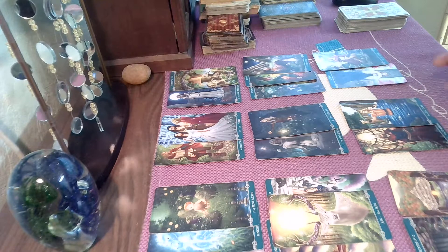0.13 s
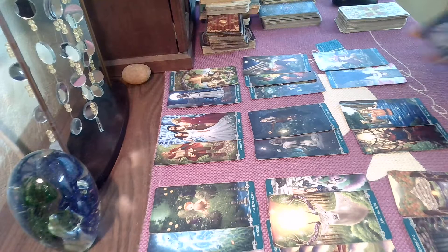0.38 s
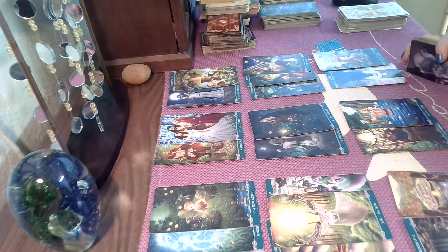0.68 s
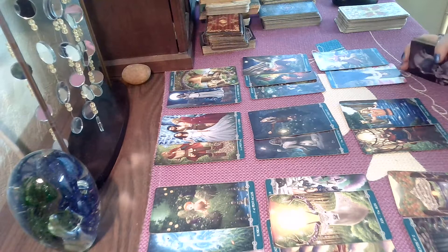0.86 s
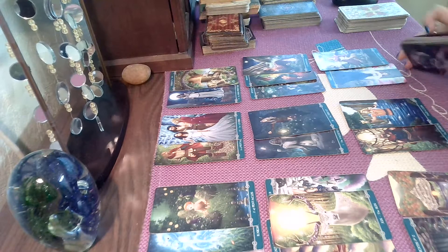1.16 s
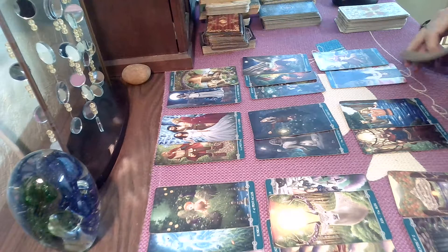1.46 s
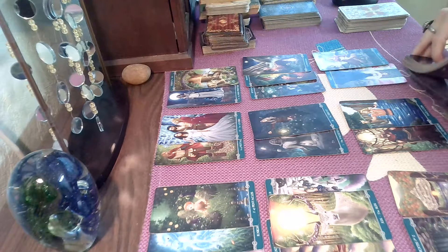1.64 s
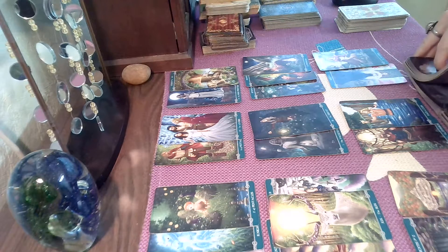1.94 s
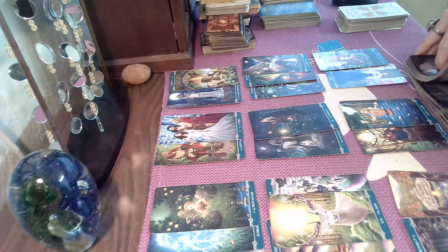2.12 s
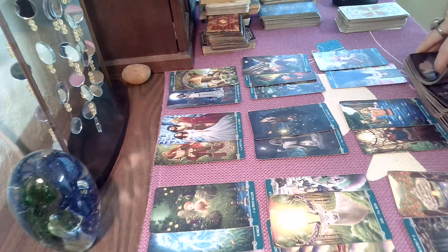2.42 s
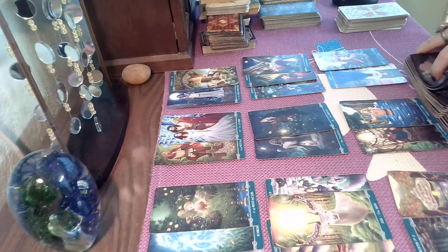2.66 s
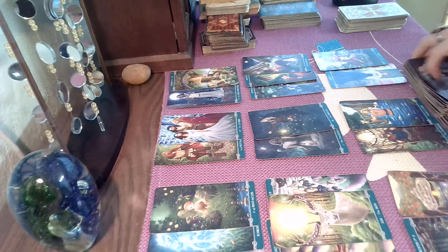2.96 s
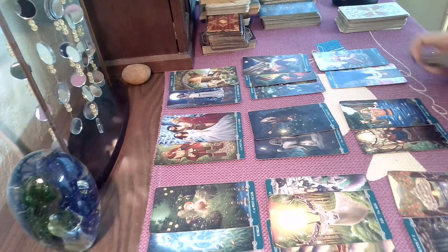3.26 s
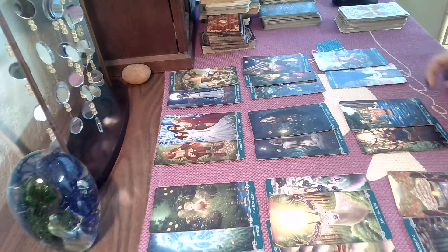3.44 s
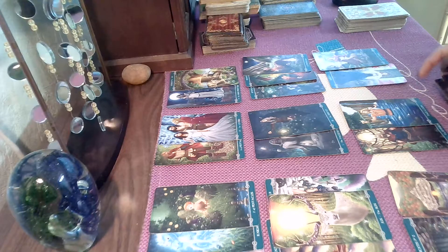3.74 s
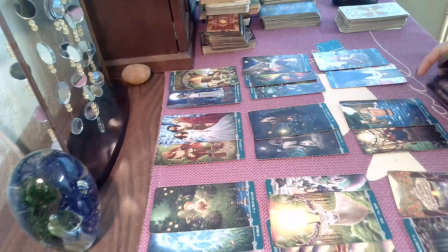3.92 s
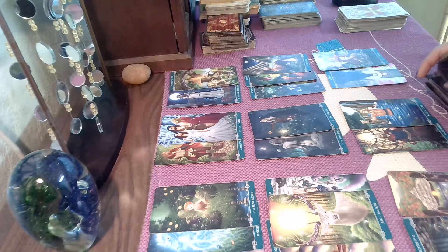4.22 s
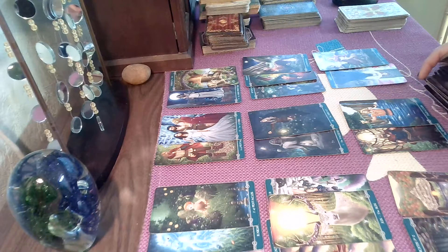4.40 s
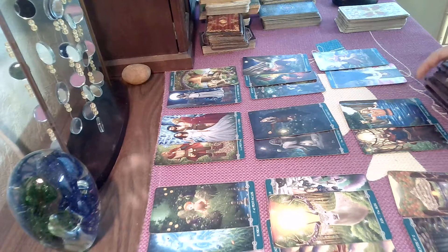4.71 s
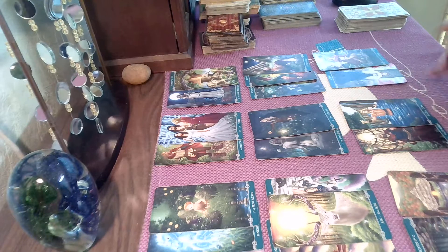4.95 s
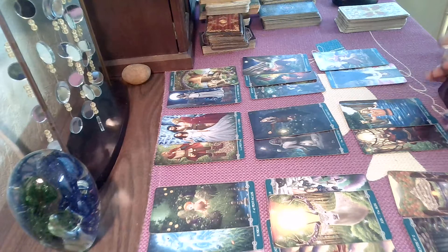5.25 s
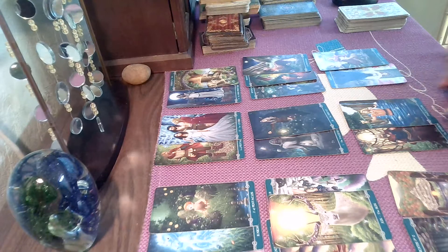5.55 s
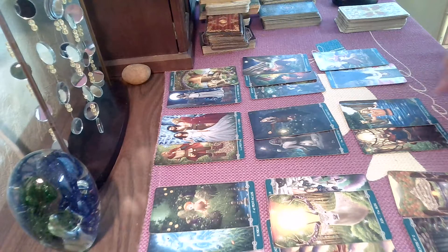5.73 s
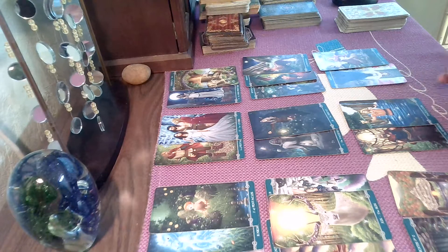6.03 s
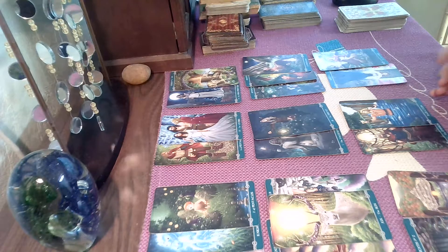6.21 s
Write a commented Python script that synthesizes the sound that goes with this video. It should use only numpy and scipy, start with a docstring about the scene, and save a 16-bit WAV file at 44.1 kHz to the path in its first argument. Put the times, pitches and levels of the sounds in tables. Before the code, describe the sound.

Close in a small room, a deck of large cards lands on a cloth-covered table with a quick soft triple thump. After a pause, an uneven snapping riffle swells and dies over a rubbing rustle. The halves are then slid together with scrapes and clicking edges, closing in a hollow tock, followed by soft double-edged knocks. Low rumble and faint hiss lie underneath.

```python
"""A small room with a cloth-covered table, beside which a deck of large cards is shuffled by hand.
The cards are riffled in uneven snapping packets (a push and a dying flutter through card bodies),
then slid together with a ticking rustle (random slips coloured by the card faces, edges catching).
Before and after, the deck is knocked square with soft thumps (thump, clack and air puff per landing).
Noise answers give the room; below lie its rumble and hiss and the dull flexing of the deck."""
import sys
import numpy as np
from scipy import signal
from scipy.fft import rfft, irfft, next_fast_len
from scipy.io import wavfile
from scipy.ndimage import map_coordinates

SR = 44100
rng = np.random.default_rng(int(sys.argv[2]) if len(sys.argv) > 2 else 0)


def int16_out(signal):
    """Quantize to a 16-bit WAV file."""
    q = np.round(np.clip(np.atleast_2d(signal).T, -1, 1) * 32767)
    wavfile.write(sys.argv[1], SR, q.astype(np.int16))


N = 280872  # samples


def amp(db):
    """Amplitude gain of a level in dB."""
    return 10 ** (np.asarray(db) / 20)


def unit(x):
    """x at rms 1."""
    return x / np.sqrt(np.mean(x ** 2) + 1e-20)


def along(points, hz):
    """(frequency [Hz], value) points interpolated on a log frequency axis."""
    point_hz, values = np.transpose(points)
    return np.interp(np.log(hz + 1), np.log(point_hz), values)


def wobble(knots_per_s):
    """A smooth random curve through normally distributed knots."""
    knots = rng.standard_normal(int(N * knots_per_s / SR) + 4)
    return map_coordinates(knots, [np.arange(N) * knots_per_s / SR])


def filtered(x, response):
    """x times a response of frequency, zero-padded against wrap-around."""
    size = next_fast_len(x.shape[-1] + 2048, True)
    size += size % 2
    spectrum = rfft(x, size) * response(np.fft.rfftfreq(size, 1 / SR))
    return irfft(spectrum, size)[..., :x.shape[-1]]


def coloured(x, spectrum, peaks=()):
    """x through a causal, minimum-phase body with this spectrum and these narrow resonances."""
    def response(hz):
        gain = amp(along(spectrum, hz))
        for centre_hz, width_hz, db in peaks:
            detune = 2 * (hz - centre_hz) / width_hz
            gain = gain * np.sqrt(1 + amp(db) ** 2 / (1 + detune ** 2))
        # folding the cepstrum onto positive time makes the phase minimal
        cepstrum = irfft(np.log(gain))
        cepstrum[..., 1:len(hz) - 1] *= 2
        cepstrum[..., len(hz):] = 0
        return np.exp(rfft(cepstrum))
    return filtered(x, response)


def contacts(t60_s, flutter_db, spectrum, peaks=(), size=3072):
    """One row of unit energy per contact: a sharp push plus a dying flutter of card edges."""
    t = np.arange(size) / SR
    decay = 1000. ** (-t / np.maximum(t60_s, .001)[:, None])
    force = rng.standard_normal((len(t60_s), size)) * decay
    force *= amp(np.reshape(flutter_db, (-1, 1))) / np.linalg.norm(force, axis=1, keepdims=True)
    force[:, 0] += 1  # the push
    sound = coloured(force, spectrum, peaks)
    return sound / np.linalg.norm(sound, axis=1, keepdims=True)


def placed(times_s, sounds):
    """Rows of sound summed at their times."""
    index = np.round(times_s * SR).astype(int)[:, None] + np.arange(sounds.shape[1])
    return np.bincount(index.ravel(), sounds.ravel(), N)[:N]


def swells(rows):
    """Sum of bell-shaped gains, one per (time of peak [s], level [dB], half length to 1/e [s]) row."""
    t = np.arange(N) / SR
    return sum(amp(db) * np.exp(-((t - s) / half_s) ** 2) for s, db, half_s in rows)


def slips(slips_per_s, spread_db, smooth):
    """Friction force of rms 1: tiny slips of uneven size on a smooth drag."""
    sizes = amp(spread_db * np.minimum(rng.exponential(size=N), 3)) * rng.choice([-1, 1], N)
    impulses = unit(sizes * (rng.random(N) < slips_per_s / SR))
    return unit(impulses + smooth * rng.standard_normal(N))


# background spectrum: (frequency [Hz], relative level [dB per Hz])
AIR_SPECTRUM = [(12, -33), (20, -7), (30, 1), (64, -13), (119, -10), (148, -20.5), (238, -23), (315, -25.5),
                (362, -24.5), (439, -28.5), (631, -28), (705, -28), (1820, -31), (3080, -30),
                (15500, -33.5)]
AIR_RMS_DB, AIR_TOP_HZ = -53, 15900


def air():
    """Steady room rumble and microphone hiss: stationary shaped noise."""
    noise = filtered(rng.standard_normal(N), lambda hz: amp(along(AIR_SPECTRUM, hz)) * (hz < AIR_TOP_HZ))
    return amp(AIR_RMS_DB) * unit(noise)


# reverberation time of the tail: (frequency [Hz], t60 [s])
ROOM_T60 = [(150, 0.52), (600, 0.29), (3000, 0.28), (14000, 0.12)]


def room(x, near_db=-11, tail_db=-8, count=48):
    """Near surfaces answer around 8 ms; a diffuse tail follows, both drawn afresh per equal stretch."""
    out = np.zeros(N + SR)
    hz, t, z = signal.stft(rng.standard_normal((count, SR // 2)), SR, nperseg=256)
    decay = 1000. ** (-t / along(ROOM_T60, hz)[:, None])
    tails = signal.istft(z * decay, SR, nperseg=256)[1]
    t = np.arange(tails.shape[1]) / SR
    tails *= 1 - np.exp(-(t / 0.0045) ** 2)  # gradual onset
    tails /= np.linalg.norm(tails, axis=1, keepdims=True)
    near = rng.standard_normal(tails.shape) * np.exp(-((t - .008) / 0.0023) ** 2)
    near /= np.linalg.norm(near, axis=1, keepdims=True)
    answers = amp(near_db) * near + amp(tail_db) * tails
    for part, answer in zip(np.array_split(np.arange(N), count), answers):
        echo = signal.fftconvolve(x[part], answer)
        out[part[0]:part[0] + len(echo)] += echo
    return out[:N]


# the room's answer to a knock: (frequency [Hz], gain [dB])
WALL_GAIN = [(100, -2.4), (350, 0), (700, 0.5), (3000, -2)]
# room modes that hang on after the knocks: (frequency [Hz], width [Hz], level [dB])
ROOM_MODES = [(172.5, 20, 5), (208, 10, 6)]


def boom(knocks):
    """The room's answer to the knocks, with low modes that hang on."""
    return coloured(room(knocks, near_db=-9, tail_db=-6.5), WALL_GAIN, ROOM_MODES)


# hands bending and shifting the deck: (time of peak [s], level [dB], half length [s])
FLEX_SWELLS = [(1.34, -63, 0.043), (1.85, -56, 0.092), (2.64, -48, 0.14), (3.13, -51, 0.065)]
# flexing deck: (frequency [Hz], relative level [dB per Hz])
FLEX_SPECTRUM = [(40, -4), (80, 6), (120, 7), (195, 5), (280, -11), (500, -24), (1500, -48)]


def handling(lumps_db=3):
    """The thick deck flexes in the hands with a dull, lumpy rumble."""
    lumpy = rng.standard_normal(N) * amp(lumps_db * wobble(24.83))
    return swells(FLEX_SWELLS) * unit(coloured(lumpy, FLEX_SPECTRUM))


# rubbing strokes, two in the riffle, then the push:
# (start [s], attack [s], end of hold [s], release [s], rub level [dB], hiss level [dB])
RUB_STROKES = [(1.5, 1, 2.3, 0.25, -40.5, -49), (2.548, 0.024, 2.68, .13, -47, -58),
               (3.36, .16, 4.65, .09, -48.5, -56)]
FADE_DB = 18  # depth reached after one attack or release time


def strokes():
    """Rub and hiss levels in dB: each stroke swells, holds and lets go."""
    t = np.arange(N) / SR
    start, attack, end, release, rub_db, hiss_db = np.transpose(RUB_STROKES)[..., None]
    fade = np.maximum(1 - (t - start) / attack, 0) + np.maximum((t - end) / release, 0)
    shape_db = np.where(t < start, -120, -FADE_DB * fade)
    return np.max(rub_db + shape_db, axis=0), np.max(hiss_db + shape_db, axis=0)


# rubbing faces: (frequency [Hz], relative level [dB per Hz])
RUB_SPECTRUM = [(60, -3), (200, -13), (680, -24.5), (900, -21.5), (1500, -17.5), (2000, -13), (2750, -2),
                (3400, -1), (4000, -7.5), (5200, -17), (9000, -77)]
# hiss of the slide: (frequency [Hz], relative level [dB per Hz])
HISS_SPECTRUM = [(2500, -21), (5000, 2), (7200, 10.5), (10000, 11), (12500, 11.5), (14500, 21.5),
                 (15600, 13), (16100, -21)]
# narrow card resonances, also in scrapes, flicks and hits: (frequency [Hz], width [Hz], level [dB])
CARD_RESONANCES = [(1330, 36, -9), (1813, 310, 1), (2676, 23, -10), (2883, 25, -18), (3197, 150, 7.5),
                   (4520, 100, 4.5)]


def rubbing():
    """Faces slide with a hiss while edges catch; the hand's pressure is uneven."""
    rub_db, hiss_db = strokes()
    pressure = amp(3.5 * wobble(70))
    force = slips(slips_per_s=450, spread_db=3.5, smooth=.6) * pressure
    rub = amp(rub_db) * unit(coloured(force, RUB_SPECTRUM, CARD_RESONANCES))
    hiss = amp(hiss_db) * unit(coloured(force, HISS_SPECTRUM))
    return rub + hiss


# short scrapes of face across face: (time of peak [s], level [dB], half length [s])
SCRAPE_SWELLS = [(3.52, -45, 0.023), (3.665, -52, 0.018), (3.812, -43, 0.013), (3.913, -44.5, 0.041),
                 (4.032, -40.5, 0.0096), (4.077, -41, 0.018), (4.143, -38.5, 0.0097), (4.184, -35.5, 0.014),
                 (4.296, -35, 0.0088), (6.35, -55, 0.012)]
# scraping face: (frequency [Hz], relative level [dB per Hz])
SCRAPE_SPECTRUM = [(600, -59), (1700, -16), (2600, -3.5), (3300, 1.5), (4000, -4), (4700, -9.5),
                   (5600, -10.5), (7000, -18), (9000, -31), (14500, -20), (16300, -15)]


def scrapes():
    """A card gives way and slides a short stretch with a brighter swish of dense slips."""
    force = slips(slips_per_s=1500, spread_db=3, smooth=.5)
    return swells(SCRAPE_SWELLS) * unit(coloured(force, SCRAPE_SPECTRUM, CARD_RESONANCES))


# small tick: (frequency [Hz], relative level [dB per Hz])
TICK_SPECTRUM = [(60, -40), (200, -9.5), (680, -5.5), (900, -11), (1800, -0.5), (3200, 7.5), (4300, -8),
                 (6500, 2.5), (10000, -15), (14500, -10), (16500, -38)]
# card slap, also in card hits: (frequency [Hz], relative level [dB per Hz])
SLAP_SPECTRUM = [(50, -39.5), (120, 9), (190, 2), (280, -1.5), (700, 3), (900, -5.5), (1300, 0),
                 (1850, -0.5), (2300, 3), (3200, -25), (6000, -22)]
TICK_T60_S = .009


def ticks(ticks_per_s=60, tick_db=21, spread_db=1.5, slap_db=-9):
    """Small random ticks with a light slap during the rubbing strokes, as loud as the rubbing is hard."""
    rub_db, _ = strokes()
    index = np.flatnonzero((rng.random(N) < ticks_per_s / SR) & (rub_db > -70))
    t60_s = np.full(len(index), TICK_T60_S)
    sound = contacts(t60_s, flutter_db=-4, spectrum=TICK_SPECTRUM, peaks=CARD_RESONANCES)
    sound += amp(slap_db) * contacts(t60_s, flutter_db=-1.5, spectrum=SLAP_SPECTRUM)
    scatter_db = spread_db * np.clip(rng.standard_normal(len(index)), -2, 2)
    level_db = rub_db[index] + tick_db + scatter_db
    return placed(index / SR, amp(level_db)[:, None] * sound)


# the deck closing: (time [s], relative level [dB], t60 [s])
CLOSING = (4.665, -32.5, 0.022)
# closed stack: (frequency [Hz], relative level [dB per Hz])
STACK_SPECTRUM = [(400, -5), (1500, 2), (5000, -37)]
# its ring: (frequency [Hz], width [Hz], level [dB])
STACK_RING = [(1500, 110, 14)]


def closing(tock_db=14):
    """The two halves meet with a hollow tock and the stack rings briefly."""
    s, db, t60_s = np.transpose([CLOSING])
    tock = contacts(t60_s, flutter_db=10, spectrum=STACK_SPECTRUM, peaks=STACK_RING)
    return placed(s, amp(db + tock_db) * tock)


# deck edge knocked square: (time [s], relative thump level [dB], relative air puff level [dB])
DECK_TAPS = [(0.452, -35.5, -39), (0.488, -35.5, -31), (0.519, -30, -35), (1.329, -45, -40),
             (4.964, -39, -35), (4.973, -42, -54), (4.981, -28, -58), (4.999, -32.5, -36),
             (5.688, -30.5, -39), (5.702, -25.5, -50), (5.706, -24.5, -34), (6.048, -28, -29.5),
             (6.055, -26.5, -48), (6.065, -30, -31)]
# thump of the deck: (frequency [Hz], relative level [dB per Hz])
THUMP_SPECTRUM = [(40, -21), (90, -6.5), (140, 5), (200, -4), (260, -5), (340, -1.5), (520, -8.5),
                  (720, -5.5), (900, -19.5), (2000, -45), (5000, -39)]
# cards touching down: (frequency [Hz], relative level [dB per Hz])
CLACK_SPECTRUM = [(400, -5.5), (1100, 8.5), (1500, 4.5), (1900, 6), (2300, -1), (3100, 9.5), (3800, -4.5),
                  (6000, -28), (16000, -39)]
# air squeezed out: (frequency [Hz], relative level [dB per Hz])
PUFF_SPECTRUM = [(15, -6), (35, -17), (60, -10), (100, -10), (300, -57)]
# low resonances under every knock, the first also in slaps: (frequency [Hz], width [Hz], level [dB])
HOLLOW_MODES = [(178, 15, 2.5), (343, 64, 1), (553, 9.3, 10.5), (676, 50, -0.5)]
TAP_T60_S, TYPICAL_THUMP_DB, TYPICAL_PUFF_DB = 0.024, -27.5, -46
CLACK_DB_PER_THUMP_DB = 0.65
CLACK_LOSS_DB_PER_PUFF_DB = 0.26  # trapped air softens a landing


def taps(thump_db=17, clack_db=7, puff_db=19):
    """The deck lands softly, its cards touching down in a flutter and squeezing out a puff of air."""
    s, thump, puff = np.transpose(DECK_TAPS)
    t60_s = np.full(len(s), TAP_T60_S)
    clack = TYPICAL_THUMP_DB + CLACK_DB_PER_THUMP_DB * (thump - TYPICAL_THUMP_DB)
    clack -= CLACK_LOSS_DB_PER_PUFF_DB * (puff - TYPICAL_PUFF_DB)
    thumps = contacts(t60_s, flutter_db=0.5, spectrum=THUMP_SPECTRUM, peaks=HOLLOW_MODES)
    clacks = contacts(t60_s, flutter_db=5, spectrum=CLACK_SPECTRUM)
    puffs = contacts(t60_s, flutter_db=-11, spectrum=PUFF_SPECTRUM)
    sound = amp(thump + thump_db)[:, None] * thumps
    sound += amp(clack + clack_db)[:, None] * clacks
    sound += amp(puff + puff_db)[:, None] * puffs
    return placed(s, sound)


# ringing card: (frequency [Hz], relative level [dB per Hz])
RING_SPECTRUM = [(300, -44), (1500, -16), (2200, -12), (2650, -4.5), (3000, -5), (3400, -3), (3650, -7.5),
                 (4000, -11), (4500, -19.5), (5200, -23), (9000, -38)]
# card cracking free: (frequency [Hz], relative level [dB per Hz])
CRACK_SPECTRUM = [(1500, -21), (4000, 17.5), (5800, 11.5), (7500, 9.5), (10000, 8), (12500, 10),
                  (15500, -8), (17000, -58)]
# sizzle of a sharp edge: (frequency [Hz], relative level [dB per Hz])
SIZZLE_SPECTRUM = [(7000, -40), (11000, 1), (12800, 5), (14200, 15.5), (15300, 9), (16000, 1), (17000, -8),
                   (19000, -37)]
TYPICAL_DB, TYPICAL_EDGE_DB = -15.5, -44
DOUBLING_DB = 49  # a packet this much stronger rings twice as long
SLAP_LOSS_DB_PER_EDGE_DB = 0.14  # a sharp edge glances off
SLAP_LIFE, CRACK_LIFE, SIZZLE_LIFE = .8, .4, .3  # shares of the ring's t60
# each bent packet has a pitch of its own; scatter is in log frequency
BEND_HZ, BEND_SCATTER, BEND_WIDTH_HZ, BEND_DB = 2900, .22, 500, 4


def card_hits(s, strength, edge, flutter, ring_t60_s, slap_db_per_db, ring_db, slap_db, crack_db, sizzle_db):
    """Cards crack free, ring, and slap their neighbours; thick packets ring longer, sharp edges sizzle."""
    t60_s = ring_t60_s * 2 ** ((strength - TYPICAL_DB) / DOUBLING_DB)
    slap = TYPICAL_DB + slap_db_per_db * (strength - TYPICAL_DB)
    slap = slap - SLAP_LOSS_DB_PER_EDGE_DB * (edge - TYPICAL_EDGE_DB)
    bend_hz = BEND_HZ * np.exp(BEND_SCATTER * rng.standard_normal((len(s), 1)))
    ring_peaks = CARD_RESONANCES + [(bend_hz, BEND_WIDTH_HZ, BEND_DB)]
    slap_peaks = CARD_RESONANCES + HOLLOW_MODES[:1]
    # the treble is over sooner and lies more in the first push
    layers = (
        (strength + ring_db, contacts(t60_s, flutter, RING_SPECTRUM, ring_peaks)),
        (slap + slap_db, contacts(SLAP_LIFE * t60_s, flutter - 3, SLAP_SPECTRUM, slap_peaks)),
        (edge + crack_db, contacts(CRACK_LIFE * t60_s, flutter - 4, CRACK_SPECTRUM)),
        (edge + sizzle_db, contacts(SIZZLE_LIFE * t60_s, flutter - 5, SIZZLE_SPECTRUM)))
    return placed(s, sum(amp(db)[:, None] * sound for db, sound in layers))


# single edges catching as the halves are lined up and pushed together:
# (time [s], relative strength [dB], relative sharp edge level [dB])
EDGE_CATCHES = [(0.9393, -35, -62), (0.9593, -37.5, -60), (1.3596, -27, -63), (2.9247, -36, -56.5),
                (2.9846, -42, -61), (3.0095, -37.5, -54), (3.7432, -28, -47), (3.7901, -17.5, -35),
                (3.8613, -28, -52), (3.8829, -18, -36), (3.912, -17.5, -43), (3.9738, -24.5, -38),
                (4.0034, -24, -66), (4.0171, -20.5, -37), (4.0473, -24, -75), (4.1007, -26.5, -63),
                (4.1436, -22.5, -43), (4.2522, -27.5, -47), (4.3314, -26, -49), (4.4193, -22, -53),
                (4.433, -21, -41), (4.4597, -16.5, -60), (4.475, -22, -48), (4.5013, -10.5, -33.5),
                (4.5067, -18, -60), (4.537, -22, -47), (4.5574, -23, -69), (4.63, -30, -48),
                (4.664, -23.5, -42)]
CATCH_FLUTTER_DB, CATCH_T60_S = -1, 0.023  # edges let go in one clean push
CATCH_SLAP_DB_PER_DB = 0.88  # slap per strength


def catches():
    """Edges snag and let go, with more crack and less slap than a falling packet."""
    s, strength, edge = np.transpose(EDGE_CATCHES)
    return card_hits(s, strength, edge, CATCH_FLUTTER_DB, CATCH_T60_S, CATCH_SLAP_DB_PER_DB,
                     ring_db=11.5, slap_db=-1, crack_db=19, sizzle_db=17)


# packets flicking off the thumb in the riffle:
# (time [s], relative strength [dB], relative sharp edge level [dB], flutter over push [dB])
RIFFLE_SNAPS = [(1.5292, -37.5, -58, 33), (1.5571, -13, -44, 1.5), (1.6179, -16.5, -45, 14),
                (1.6345, -26, -60, 12), (1.6798, -22.5, -40, 38), (1.7242, -25, -55, 4),
                (1.7486, -17.5, -35, 18), (1.7667, -34, -53, 6), (1.8042, -25, -60, 15),
                (1.8191, -22, -44, 22), (1.8378, -26, -52, -8), (1.8536, -20.5, -54, -8),
                (1.8914, -23.5, -56, 3), (1.9101, -11, -27, 2.5), (1.941, -7.5, -27.5, -3.5),
                (1.962, -16, -38, 21), (1.989, -12, -27.5, 4), (1.9955, -15.5, -45, 24),
                (2.0652, -6, -29.5, 3), (2.099, -15.5, -40, 15), (2.1037, -24, -40, 17),
                (2.138, -10.5, -30, 3), (2.1616, -11, -28, 18), (2.1654, -12.5, -27, -4),
                (2.1876, -35, -47, 10), (2.2066, -13.5, -23, 9), (2.2165, -6, -16.5, 4.5),
                (2.236, -33, -35, 5), (2.2542, -10, -36, -2), (2.2824, -12.5, -35, 6),
                (2.2965, -13.5, -37, -1), (2.3104, -14, -37, 11), (2.3237, -10, -33, 2),
                (2.328, -10, -26, 6), (2.3617, -5.5, -30.5, 3), (2.387, -12.5, -40, 9),
                (2.4163, -37, -55, 12), (2.4551, -4.5, -36, 6), (2.4616, -11.5, -36, 15),
                (2.512, -34, -48, 8), (2.554, -36, -54, 8), (2.5623, -14.5, -37, 8), (2.5799, -26, -50, 4),
                (2.592, -17, -53, 4.5), (2.6064, -14.5, -48, 6), (2.6241, -19, -33, 10),
                (2.6493, -15, -46, 15), (2.665, -17, -39, 13), (2.671, -18, -38, 9), (2.6771, -8.5, -29, 2),
                (2.6974, -24, -53, 20), (2.7055, -23, -52, 10), (2.716, -29, -46, -16),
                (2.7745, -20.5, -42, 16), (2.7835, -12.5, -21, 5)]
SNAP_T60_S = 0.023  # of a typical packet
SNAP_SLAP_DB_PER_DB = 0.67  # slap per strength
PILE_DB_PER_S = 5  # the growing pile cushions later packets


def snaps(first_slap_db=7):
    """The riffle: packets leave the thumb and land on the cards below, hardest while the pile is thin."""
    s, strength, edge, flutter = np.transpose(RIFFLE_SNAPS)
    slap_db = first_slap_db - PILE_DB_PER_S * (s - s[0])
    return card_hits(s, strength, edge, flutter, SNAP_T60_S, SNAP_SLAP_DB_PER_DB,
                     ring_db=11.5, slap_db=slap_db, crack_db=12, sizzle_db=16)


def scene():
    """The background, the deck in its room and the cards."""
    background = air() + handling()
    cards = rubbing() + scrapes() + ticks() + closing() + catches() + snaps()
    cards_in_room = cards + room(cards, near_db=-14.5, tail_db=-11.0)
    knocks = taps()
    return (background + knocks + boom(knocks) + cards_in_room)[None]


TOP_HZ = 16300


def record(dry):
    """Band limit: nothing passes at or above TOP_HZ."""
    return filtered(dry, lambda hz: hz < TOP_HZ)


dry = scene()
out = record(dry)
int16_out(out)
```